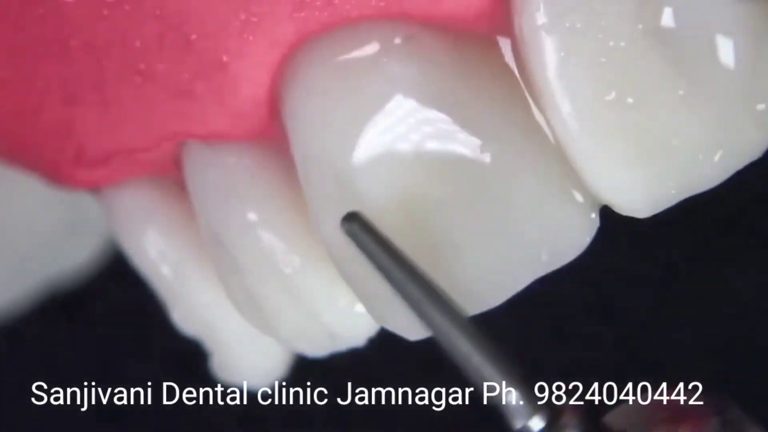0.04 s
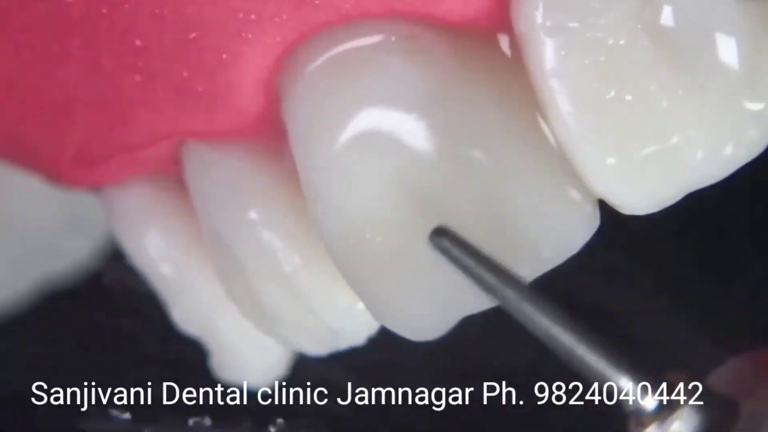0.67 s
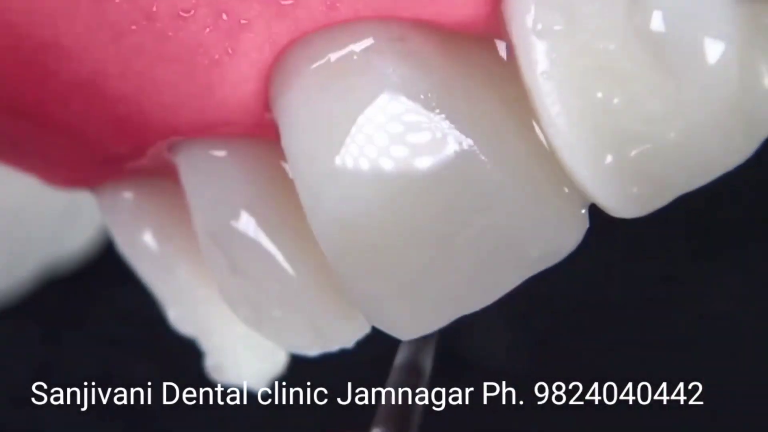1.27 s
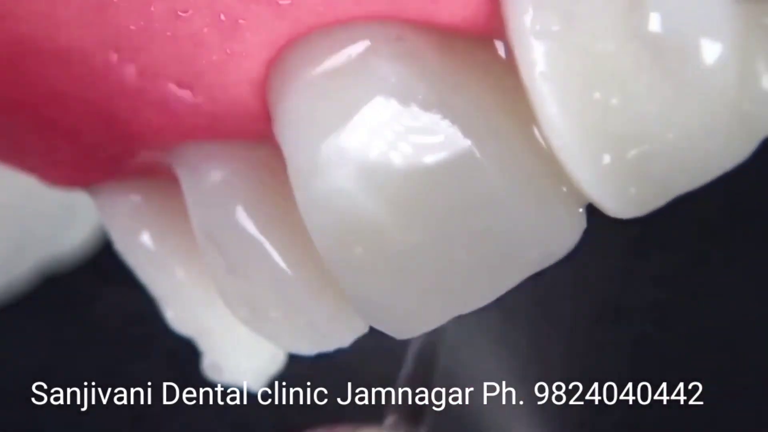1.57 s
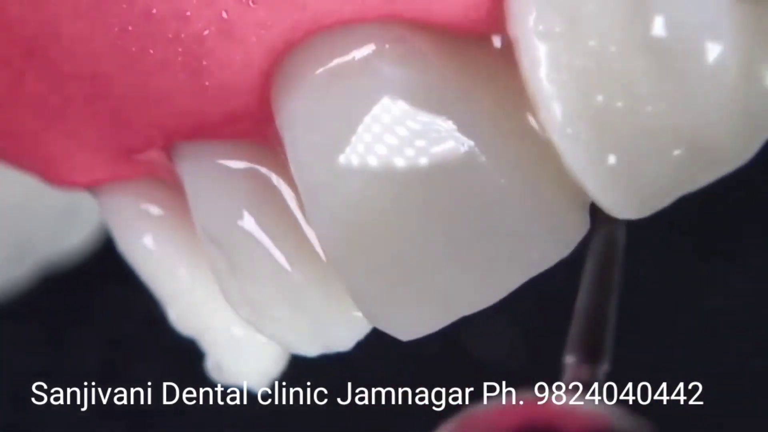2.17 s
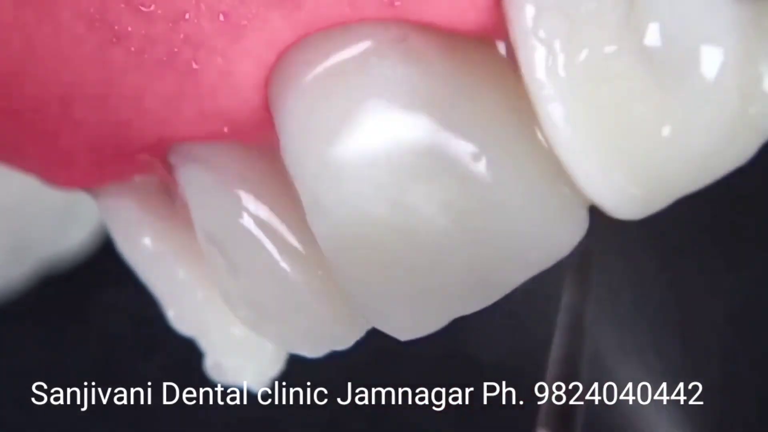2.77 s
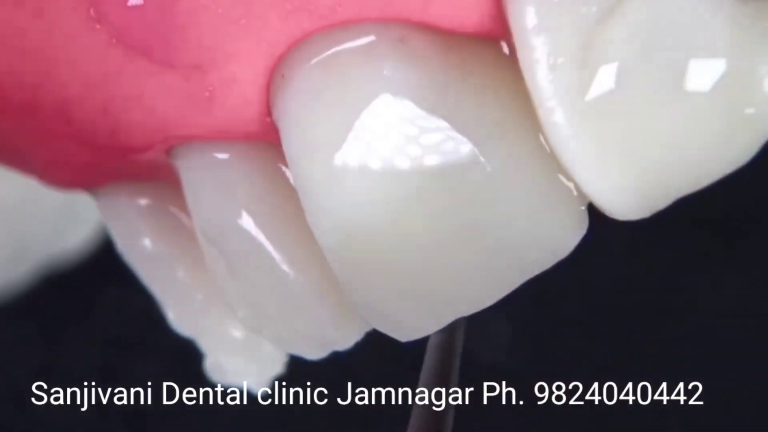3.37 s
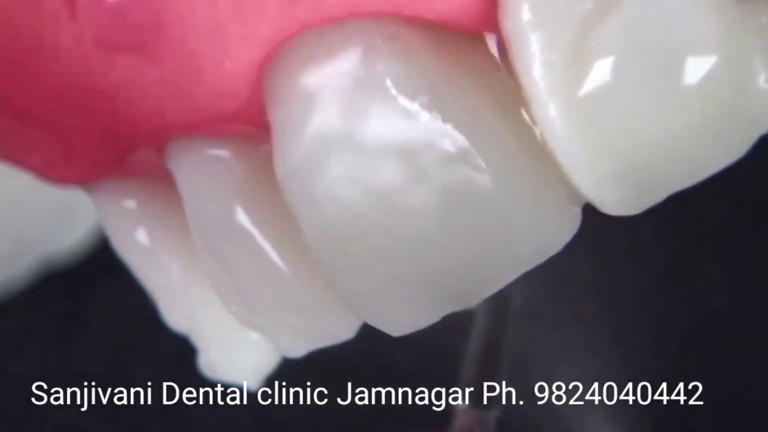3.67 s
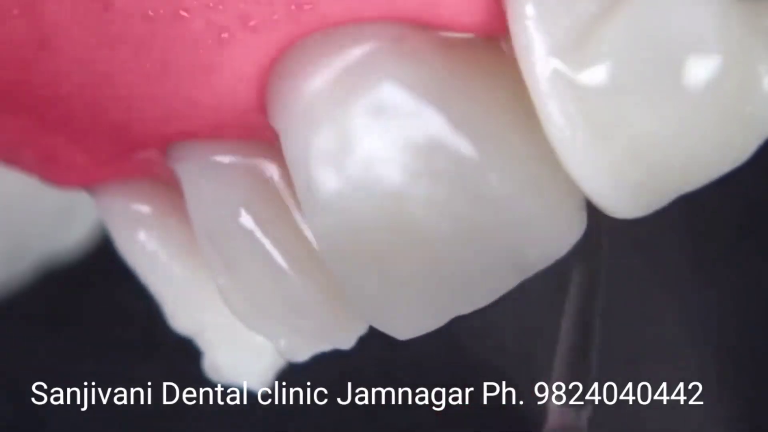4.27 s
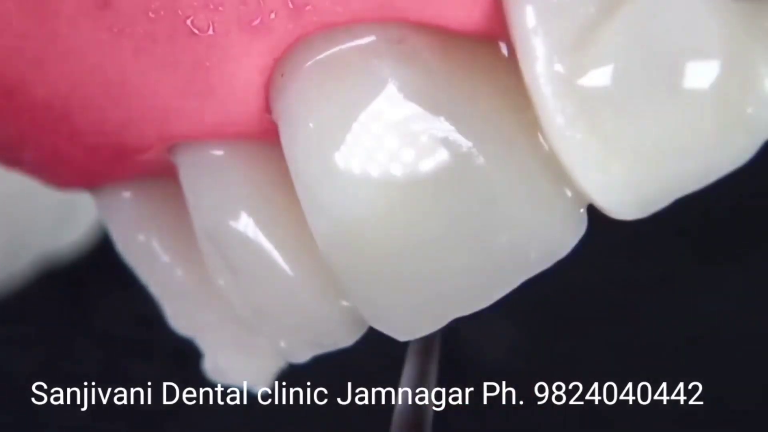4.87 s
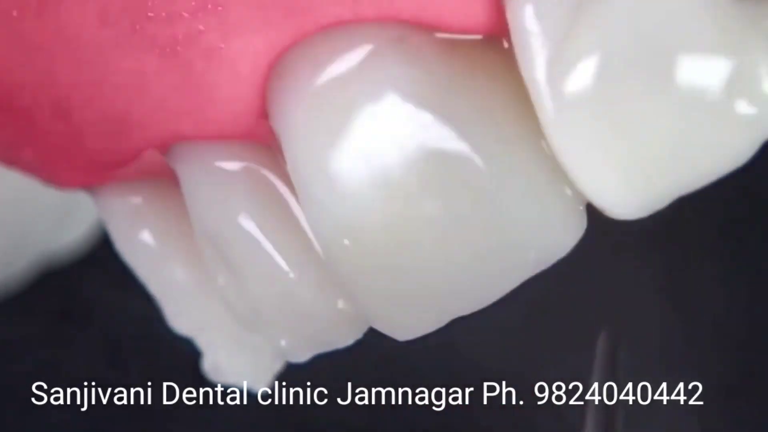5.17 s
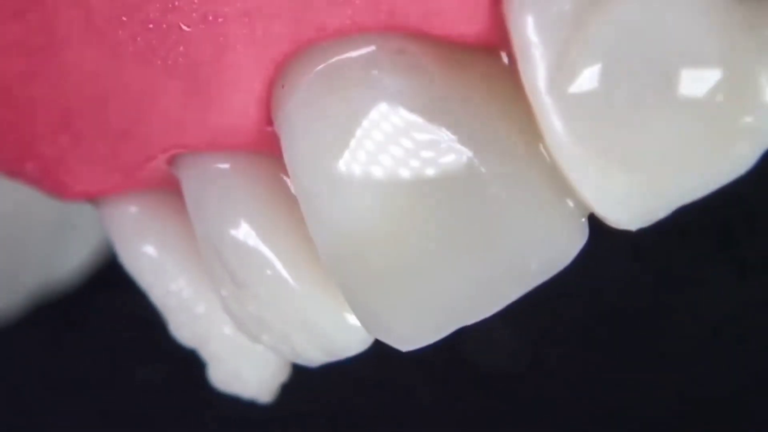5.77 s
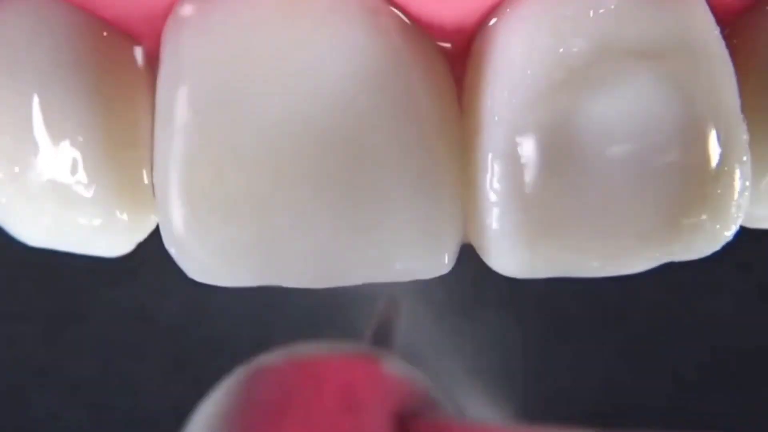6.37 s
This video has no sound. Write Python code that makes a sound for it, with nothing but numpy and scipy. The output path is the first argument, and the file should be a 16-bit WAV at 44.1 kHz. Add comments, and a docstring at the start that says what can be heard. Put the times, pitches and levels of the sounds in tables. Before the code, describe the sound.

Close, high-pitched whine of a dentist's air drill lightly trimming a model tooth, with continuous hissing spray.

```python
"""Dental handpiece, close up

An air turbine trims a model tooth in light strokes, right at the microphone. The rotor whines near
6 kHz, sags under each stroke of the bur and spins back up; drive air and water mist hiss from the head.
Spray washes over the teeth as the head turns, stray air flutters on the microphone, a faint hum swells."""
import sys
import numpy as np
from scipy import signal
from scipy.fft import rfft, irfft
from scipy.io import wavfile
from scipy.ndimage import map_coordinates

SR = 44100
rng = np.random.default_rng(int(sys.argv[2]) if len(sys.argv) > 2 else 0)


def wrap_up_sound(samples):
    """Save the sound to the file named by the first command line argument, as 16-bit audio."""
    columns = np.atleast_2d(samples).T
    # keep every value between -1 and 1, then stretch to whole-number steps
    tamed = np.clip(columns, -1, 1)
    steps = np.round(tamed * 32767).astype(np.int16)
    wavfile.write(sys.argv[1], SR, steps)


N = 292383
TIME, FREQS = np.arange(N) / SR, np.fft.rfftfreq(N, 1 / SR)

# The bur on the tooth. Each row: start and length in seconds, pressure 0-1, change of the whine in dB.
STROKES = [(-0.285, 0.49, 0.31, -3), (0.209, 0.09, 0.97, 4.5), (0.296, 0.07, 0.63, 4.5),
           (1.028, 0.08, 0.26, -3), (1.11, 0.13, 0.14, -4), (2.05, 0.07, 0.21, -2),
           (2.12, 0.32, 0.085, 0.5), (2.28, 0.04, 0.2, -1), (2.93, 0.19, 0.27, 3), (6.08, 0.6, 0.04, 0)]
CONTACT_S = 0.031  # the bur takes this long to bite and to let go
# The hand turning the head. Each row: time in seconds, turn (0 sprays along the tooth, 1 square on).
TURN = [(0, 0.01), (1.4, 0.05), (1.62, 0.28), (2.25, 0.33), (2.7, 0.45), (3.65, 0.48), (4.05, 0.7),
        (4.3, 0.95), (5.1, 0.98), (5.5, 0.82), (6.63, 0.77)]
# Air at the nozzle, then at the microphone. Each row: time in seconds, relative level in dB.
JET_LEVELS = [(0.0, -31), (0.05, -30), (1.24, -31), (1.6, -30.5), (3.29, -31.5), (3.58, -30.5), (6.48, -32),
              (6.63, -31)]
DRAUGHT_LEVELS = [(0.0, -62), (0.79, -64), (0.92, -78), (0.96, -66.5), (1.5, -70), (1.62, -61), (2.1, -68),
                  (2.94, -60.5), (3.1, -74), (3.19, -62), (5.06, -64), (5.58, -73), (5.69, -65),
                  (6.11, -73), (6.17, -59), (6.2, -66), (6.5, -63), (6.63, -67)]
# Spectra of the jet, the landing spray and the stray air. Each row: frequency in Hz, relative level in dB.
JET_COLOUR = [(150, -36), (600, -25), (1400, -20), (3000, -20), (5300, -15.5), (6100, -19.5), (7900, -15),
              (9400, -16.5), (10900, -15), (11500, -9), (12100, -3), (13000, -1.8), (13950, 1.3),
              (15400, -.7)]
SPLASH_COLOUR = [(100, -17), (250, -7.5), (390, -13.5), (560, -7.5), (720, -10.5), (900, -5), (1400, 1),
                 (1700, -0.5), (1980, 1.5), (2230, -3), (2580, 2), (2950, -1.5), (5300, -3), (6500, -5.5),
                 (15400, -15)]
DRAUGHT_COLOUR = [(20, -35), (40, -10), (60, -6), (82, 0.5), (100, -4), (120, 2.5), (165, -13.5), (205, -5),
                  (300, -18), (700, -41)]
# Hollows and edges rung by the jet; the low hollow's last row is a thin line an octave above the whistle. Each
# row: centre and width in Hz, relative level in dB.
LOW_HOLLOW = [(3384, 280, -4), (3923, 270, -0.5), (4296, 135, -1), (4705, 116, 1)]
HIGH_HOLLOW = [(7780, 560, 0), (8900, 100, -10)]
TOOTH_GAP = [(5130, 300, -2.5), (5300, 130, -13), (6580, 320, -5), (7400, 390, -0.5)]
FAN_EDGE = [(10350, 2800, 3), (11070, 750, 3.5), (13600, 380, -14)]
NOZZLE_RING = [(12260, 720, 0)]
# The jet's aim. Each row: hollow, aimed level in relative dB, best turn, reach in turn, floor in relative dB.
AIMS = [(LOW_HOLLOW, -48.5, 0.13, 0.74, -55.5),
        (HIGH_HOLLOW, -47.5, 0.02, 0.4, -48),
        (TOOTH_GAP, -50, 0.1, 0.3, -65),
        (FAN_EDGE, -43, 0.8, 0.58, -53.5),
        (NOZZLE_RING, -38.2, 0.28, 0.62, -55)]
# Surges of spray. Each row: middle and length in seconds, relative gain in dB.
SURGES = [(0.52, 0.7, 1.9), (1.651, 0.35, 1.4), (4.414, 0.91, 1.54), (6.45, 0.51, 1.8)]
# Resonances of spray hitting squarely, of a gap it sweeps past, and of the tooth under the bur.
# Each row: centre and width in Hz, relative level in dB.
SPLASH_BODY = [(274, 176, -2), (518, 200, -1.5), (890, 350, 0.5), (1400, 390, 1)]
SWEEP_MODES = [(2620, 210, 0)]
TOOTH_MODES = [(4230, 320, -9), (5120, 180, -3), (7000, 200, 7)]
# The bur catching. Each row: middle in seconds, centre and width in Hz, length in seconds, level in dB.
SQUEAKS = [(.285, 11700, 250, 0.035, -42.5), (0.504, 2900, 900, 0.098, -48), (0.48, 570, 150, .14, -59),
           (1.12, 5000, 130, .04, -43)]
# Three swells of low hum. Each row: start and length in seconds, level in dB.
HUM_SWELLS = [(2.5, 0.49, -68), (3.121, 0.44, -63.5), (3.75, 0.42, -66)]


def amp(db):
    """Decibels to gain."""
    return 10 ** (np.asarray(db) / 20)


def curve(rows):
    """Joins (seconds, value) points, sample by sample."""
    return np.interp(TIME, *np.transpose(rows))


def held(start, length, ramp):
    """1 during an event, 0 outside, with straight ramps centred on its ends."""
    return np.clip(np.minimum(TIME - start, start + length - TIME) / ramp + .5, 0, 1)


def bell(x, centre, reach):
    """1 at the centre, falling smoothly to either side."""
    return np.exp(-((x - centre) / reach) ** 2)


def swell(middle_s, length_s, db):
    """Gain that rises and falls smoothly around a moment."""
    return amp(db) * bell(TIME, middle_s, length_s / 2)


def colour(points):
    """Gain over frequency from (Hz, dB) points, falling away below the first."""
    hz, db = np.transpose(points)
    low_cut = np.minimum(FREQS / hz[0], 1) ** 2
    return amp(np.interp(np.log(FREQS + 1), np.log(hz), db)) * low_cut


def resonances(modes):
    """Gain over frequency of (Hz, width, dB) resonances with steep skirts."""
    peaks = (amp(db) / (1 + 2 * ((FREQS - hz) / width) ** 2) for hz, width, db in modes)
    return np.sqrt(sum(peak ** 2 for peak in peaks))


def noise(gain):
    """Turbulence of rms 1 with the given gain over frequency."""
    x = irfft(rfft(rng.standard_normal(N)) * gain, N)
    return x / np.sqrt(np.mean(x ** 2) + 1e-20)


def wander(rate_hz):
    """Random drift of rms 1, up to about the given rate."""
    return noise(np.exp(-(FREQS / rate_hz) ** 2))


def bite():
    """How hard the grit cuts, 0-1: it grows as the root of the pressure."""
    return sum(np.sqrt(pressure) * held(start, length, CONTACT_S)
               for start, length, pressure, _ in STROKES)


def rotor_hz(free_hz=5975, drift_hz_per_s=8, sag_hz=900, inertia_s=0.253):
    """Each stroke brakes the rotor; lagging by its inertia, it regains its slowly sinking free speed."""
    def settled(since_s):
        return 1 - np.exp(-np.maximum(TIME - since_s, 0) / inertia_s)
    drag = sum(pressure * (settled(start) - settled(start + length))
               for start, length, pressure, _ in STROKES)
    return free_hz - drift_hz_per_s * TIME - sag_hz * drag


def turbine(whine_db=-45.5, octave_db=-54, jitter_hz=1.91, shimmer_db=0.9, chatter_db=2.5):
    """The unbalanced rotor sings once a revolution; the bite lifts its octave and makes it chatter."""
    facing_db = 3 * bell(curve(TURN), 0.88, reach=0.3)  # louder as the head comes round
    stroke_db = sum(db * held(start, length, CONTACT_S) for start, length, _, db in STROKES)
    hz = rotor_hz() + jitter_hz * wander(rate_hz=22)
    angle = 2 * np.pi * np.cumsum(hz) / SR
    unsteady_db = shimmer_db * wander(rate_hz=23) + chatter_db * bite() * wander(rate_hz=30)
    whine = amp(whine_db + facing_db + stroke_db) * np.sin(angle)
    octave = amp(octave_db + 13 * bite()) * np.sin(2 * angle)
    return np.sqrt(2) * amp(unsteady_db) * (whine + octave)


def jet(gain_db=4.0):
    """Air and mist leave the nozzle in a hiss, bright and even at this close range."""
    return amp(curve(JET_LEVELS) + gain_db) * noise(colour(JET_COLOUR))


def hollows(gain_db=0.36):
    """Turbulent air rings each hollow by as much as the jet is aimed into it."""
    turn = curve(TURN)
    out = np.zeros(N)
    for modes, aimed_db, best_turn, reach, floor_db in AIMS:
        aimed = amp(aimed_db) * bell(turn, best_turn, reach)
        out += np.hypot(aimed, amp(floor_db)) * noise(resonances(modes))
    return amp(gain_db) * out


def splash(wash_db=-49, wash_swing=1.15, body_db=-62, body_swing=3.0, patter_db=1.1):
    """Mist washes over the teeth, gains body when it hits them squarely, and rings a gap in passing."""
    surge_db = sum(db * bell(TIME, middle, length / 2) for middle, length, db in SURGES)
    landing_db = 4.5 * curve(TURN) + surge_db
    usual_db = landing_db.mean() + patter_db * wander(rate_hz=20)
    excess_db = landing_db - landing_db.mean()
    wash = amp(wash_db + usual_db + wash_swing * excess_db) * noise(colour(SPLASH_COLOUR))
    body = amp(body_db + usual_db + body_swing * excess_db) * noise(resonances(SPLASH_BODY))
    gap = swell(middle_s=3.9, length_s=0.31, db=-49.5) * noise(resonances(SWEEP_MODES))
    return wash + body + gap


def grinding(level_db=-49):
    """The bur's grit scratches the tooth into ringing, in step with the bite."""
    return amp(level_db) * bite() * noise(resonances(TOOTH_MODES))


def near_echoes(hiss):
    """Hand and model jaw throw the hiss back at the microphone; the paths drift, so ripples slide."""
    out = hiss
    for delay_s, drift_s, share in [(.0016, .0002, .08), (.0028, .0004, .11), (.0048, .0005, .11)]:
        path_s = delay_s + drift_s * wander(rate_hz=.4)
        out = out + share * map_coordinates(hiss, [(TIME - path_s) * SR], order=3, mode="reflect")
    return out


def whistle(hz=2355, width_hz=28, level_db=-71, turn_db=7):
    """A faint, narrow whistle of air grows as the head turns and flares up once."""
    steady = amp(level_db + turn_db * curve(TURN))
    flare = swell(middle_s=2.11, length_s=0.26, db=-57.5)
    return np.hypot(steady, flare) * noise(resonances([(hz, width_hz, 0)]))


def draught(flutter_db=1.2):
    """Stray air reaches the microphone as a low flutter."""
    level_db = curve(DRAUGHT_LEVELS) + flutter_db * wander(rate_hz=6.6)
    return amp(level_db) * noise(colour(DRAUGHT_COLOUR))


def squeaks():
    """Short rough chirps and scuffs where the bur catches."""
    return sum(swell(middle, length, db) * noise(resonances([(hz, width, 0)]))
               for middle, hz, width, length, db in SQUEAKS)


def hum(pitch_hz=87.5, pitch_at_s=3.0, sink_hz_per_s=6, fade_s=0.12):
    """A soft low hum comes in swells, sinking in pitch."""
    hz = pitch_hz - sink_hz_per_s * (TIME - pitch_at_s)
    gain = sum(amp(db) * held(start, length, fade_s) for start, length, db in HUM_SWELLS)
    return np.sqrt(2) * gain * np.sin(2 * np.pi * np.cumsum(hz) / SR)


def sliding_hiss(middle_s=4.5, centre_hz=13550, width_hz=320, fall_hz_per_s=720):
    """A high resonance in the hiss glides down while the head comes round."""
    hz = centre_hz - fall_hz_per_s * (TIME - middle_s)
    band = np.sqrt(2) * wander(rate_hz=width_hz) * np.sin(2 * np.pi * np.cumsum(hz) / SR)
    return swell(middle_s, length_s=1.7, db=-39.5) * band


def scene():
    """One microphone close to the model jaw hears it all, the same in both channels."""
    hiss = near_echoes(jet() + hollows() + splash() + grinding()) + sliding_hiss()
    mono = turbine() + squeaks() + hiss + whistle() + draught() + hum()
    return np.tile(mono, (2, 1))


def record(dry, edge_hz=15495):
    """The recorder cuts the top of the microphone's treble off steeply."""
    low_pass = signal.firwin(4095, edge_hz, window=("kaiser", 9), fs=SR)
    return signal.oaconvolve(dry, low_pass[None], "same")


dry = scene()
out = record(dry)
wrap_up_sound(out)
```